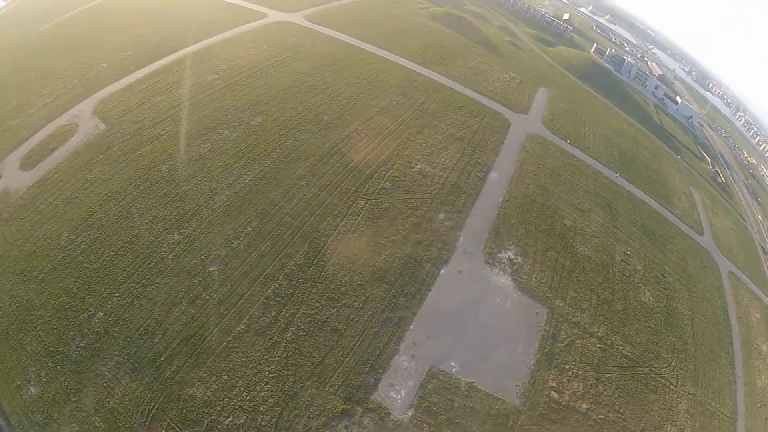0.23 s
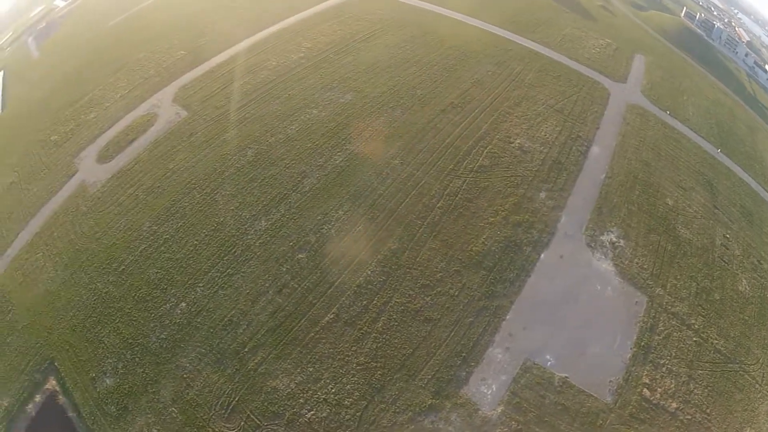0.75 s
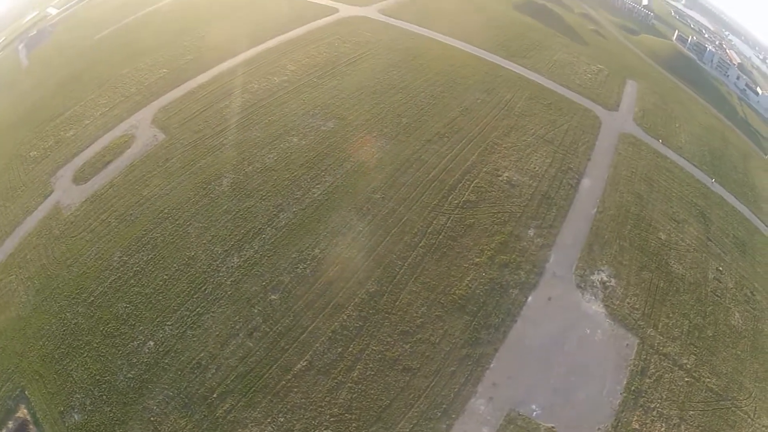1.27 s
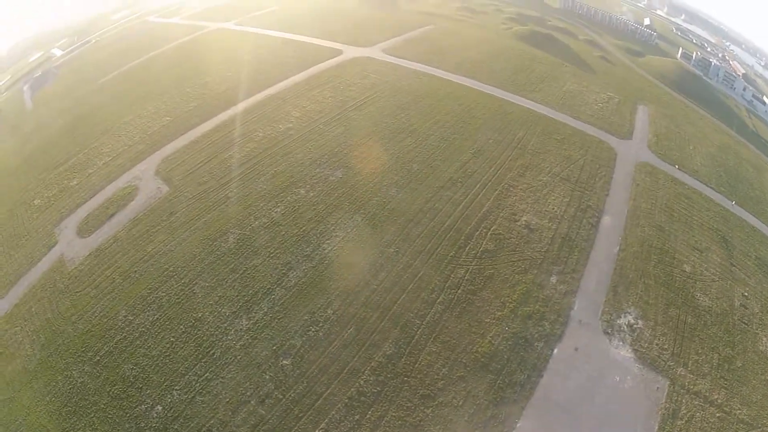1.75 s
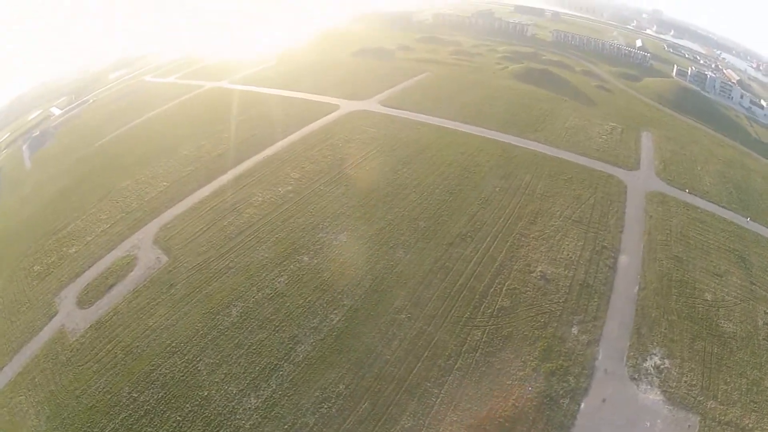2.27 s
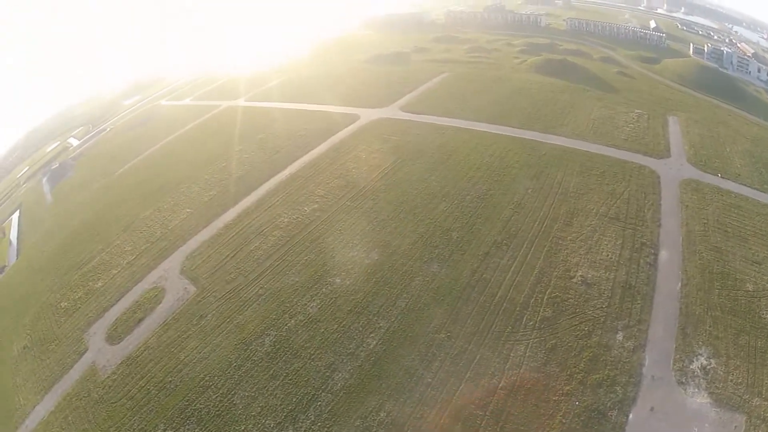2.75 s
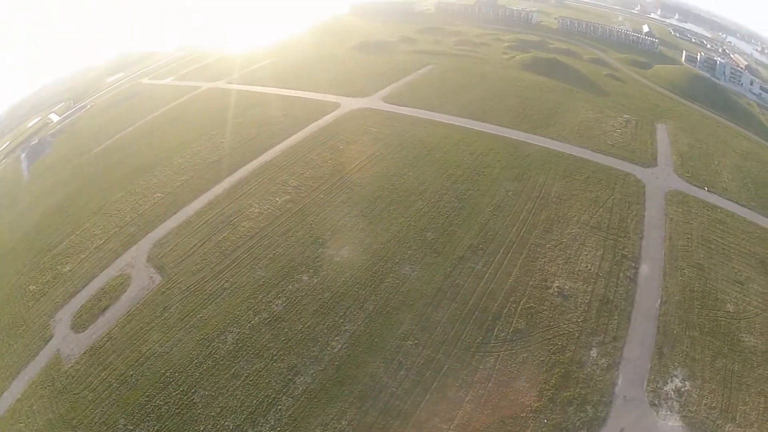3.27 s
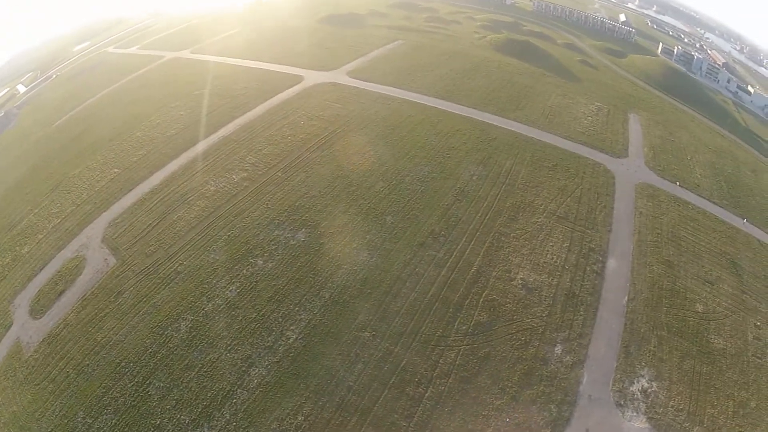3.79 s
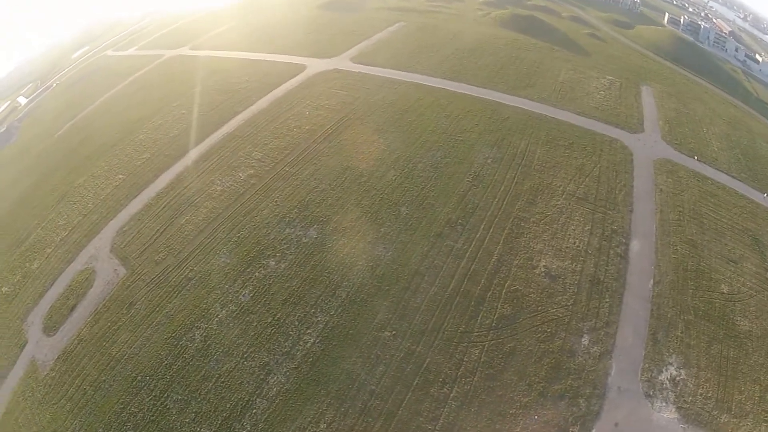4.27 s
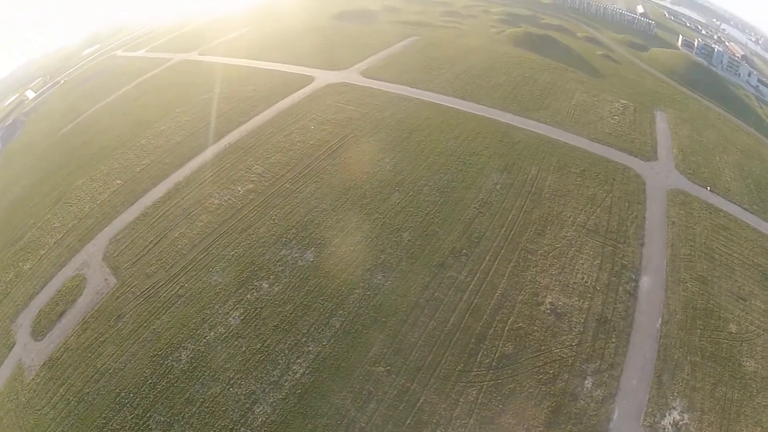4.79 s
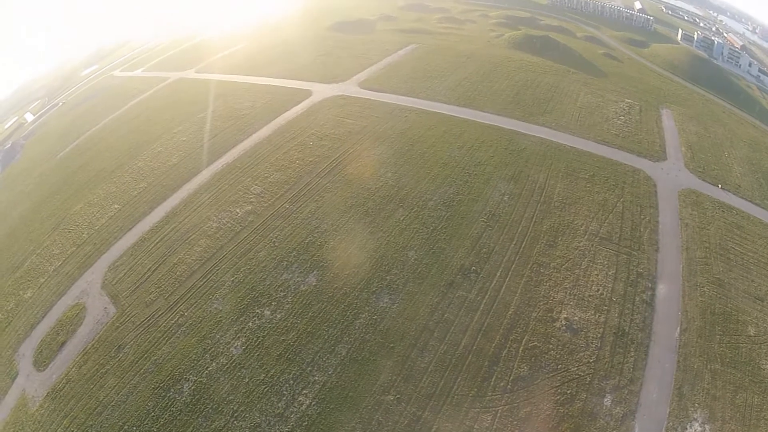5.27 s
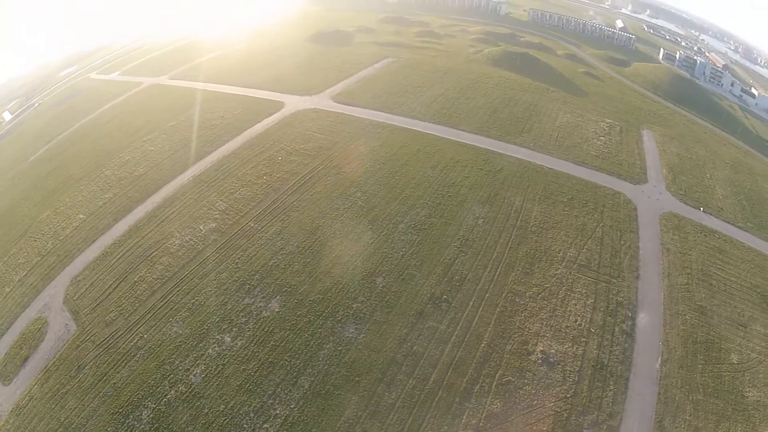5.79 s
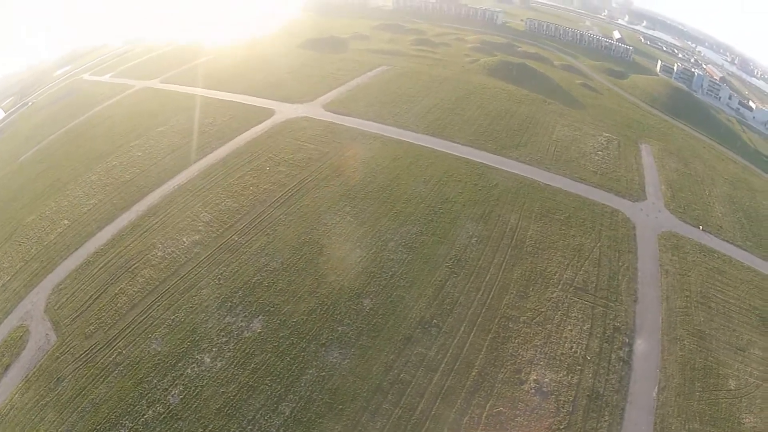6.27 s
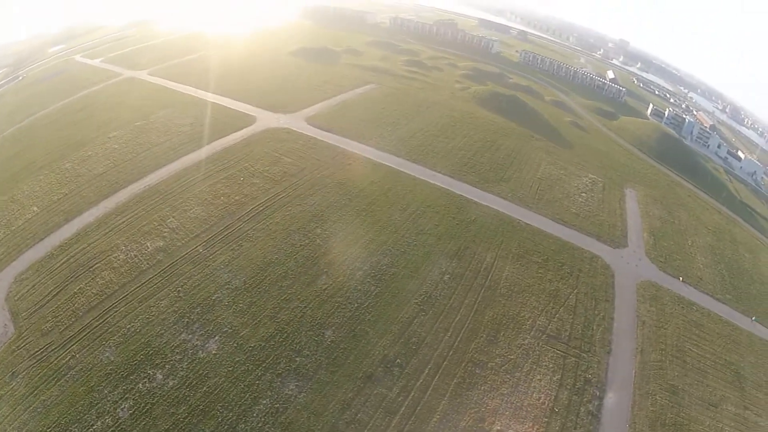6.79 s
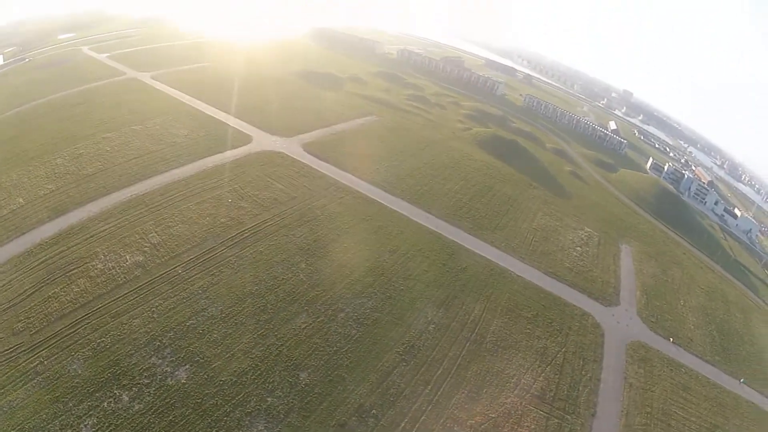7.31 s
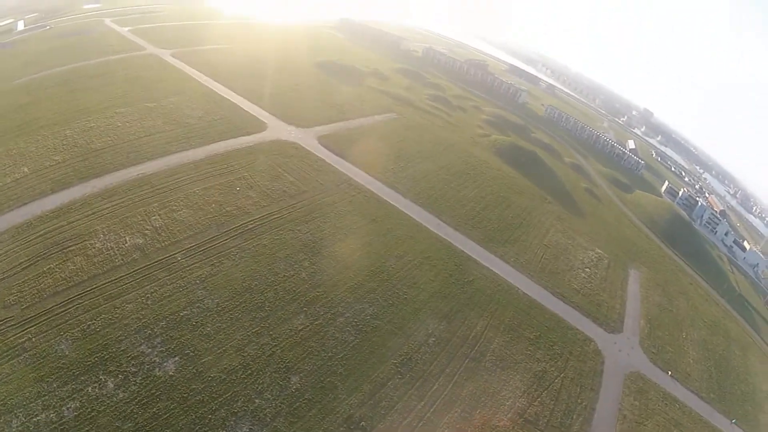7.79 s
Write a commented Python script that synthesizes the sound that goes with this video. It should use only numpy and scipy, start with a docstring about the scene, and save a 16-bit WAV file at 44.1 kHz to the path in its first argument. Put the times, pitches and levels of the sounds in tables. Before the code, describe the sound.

Heard on board, a model plane's propeller hum winds down to a low, slow throb as air rushes past and loose parts knock.

```python
"""On the body of a small electric model plane, a tiny camera listens as it throttles back and glides down.
The drive's tones follow one shaft speed, so they slide down together through the airframe's resonances,
and two neighbours beat in an ever slower throb. Beneath them the airframe shakes roughly and air rushes
past; from midway on, loose parts knock in the fuselage. The camera samples coarsely and holds each
sample, which mirrors the whole sound into a thin sizzle in the treble."""
import sys
import numpy as np
from scipy import signal
from scipy.fft import rfft, irfft, next_fast_len
from scipy.io import wavfile

SR = 44100
rng = np.random.default_rng(int(sys.argv[2]) if len(sys.argv) > 2 else 0)


def transcribe(u):
    """Save the signal u as a 16-bit wav file named by the first command-line argument.

    u: samples, shape (n,) or (channels, n), limited to [-1, 1]; the rate is SR.
    q: integer samples, one column per channel.
    """
    v = np.clip(np.atleast_2d(u).T, -1, 1)
    q = np.round(v * 32767).astype(np.int16)
    wavfile.write(sys.argv[1], SR, q)


N = 355005
TIME = np.arange(N) / SR

# main tone of the motor and propeller: time_s, pitch_hz
MAIN_PITCH = [(0.0, 395.1), (0.22, 378.2), (0.82, 362.8), (1.54, 367.7), (2.18, 383.6), (2.5, 369.8),
              (2.82, 364.0), (3.07, 349.5), (3.39, 322.1), (4.06, 280.0), (4.43, 260.4), (5.33, 249.9),
              (5.55, 235.6), (6.64, 186.7), (7.54, 158.3), (8.05, 137.6)]
# its strength as it meets resonances and nodes of the body: pitch_hz, level_db
MAIN_RESPONSE = [(138, -43), (160, -37.5), (178, -29), (202, -47), (220, -31.5), (250, -33), (265, -21),
                 (297, -17), (363, -22), (395, -33)]
# lag of the throb behind the drive's slow cycle: time_s, lag_cycles
THROB_PHASE = [(2.7, .7), (3.3, 1.15), (4.05, 1.17), (4.4, .9), (5.2, .95), (6.3, 1.08), (6.55, 1.36),
               (7.3, 1.42), (7.65, 1.12), (8.05, 1.55)]
# a partner tone just under the main one: time_s, level_db
PARTNER_LEVEL = [(0, -50), (.8, -31), (2.8, -34.5), (3.3, -23), (3.8, -18), (4.3, -41.5), (4.7, -28.5),
                 (6, -46.5), (8.05, -50)]
# weaker tones at cruise, before the airframe colours them: waves_per_cycle, level_db
SIDE_TONES = [(20, -45.5), (23, -37), (25, -39.5), (27, -41.5), (29, -47.5), (31, -37.5), (33, -36),
              (36, -39), (39, -33), (40, -38.5), (49, -42), (50, -42), (59, -40.5), (61, -43), (73, -33.5),
              (76, -44.5), (80, -46), (84, -42)]
# response of the airframe to those tones: frequency_hz, gain_db
AIRFRAME_RESPONSE = [(130, -2), (170, 2), (195, -6.5), (225, -9.5), (290, 6.5), (335, 1), (365, -3.5),
                     (410, -25), (500, -17), (590, -10.5), (660, -14.5), (750, -17), (1000, -21.5)]
# spectrum of the airframe's shaking: frequency_hz, relative_density_db
SHAKE_SPECTRUM = [(85, -29.5), (105, -18.5), (130, -9.5), (170, -7), (195, -11), (230, -3.5), (285, 2.5),
                  (335, -4), (365, -15), (410, -21.5), (520, -25.5), (590, -20), (670, -31.5), (900, -35)]
# strength of the slipstream's rush: time_s, relative_level_db
RUSH_LEVEL = [(0, -43.5), (.5, -43.5), (1.7, -40), (2.7, -42.5), (3.25, -46.5), (4.9, -45), (5.8, -47),
              (6.65, -45.8), (8.05, -49)]
# brief gusts in the slipstream: centre_s, half_width_s, lift_db
RUSH_GUSTS = [(.88, 0.041, 1.5), (2.35, 0.048, 2.5)]
# spectrum of the rush: frequency_hz, relative_density_db
RUSH_SPECTRUM = [(350, 2.5), (600, -7.5), (850, -1.5), (1170, -2.5), (1600, -1), (1900, 1), (2600, -4),
                 (3200, -9.5), (3650, -7), (4200, -17.5), (5100, -17), (5900, -26.5)]
# hollows that the air blows over: centre_hz, width_hz, lift_db
CAVITY_RESONANCES = [(973, 92, 6), (1376, 88, 6.5)]
# strength of the air's low buffeting: time_s, relative_level_db
BUFFET_LEVEL = [(0, -43), (.9, -36.5), (1.6, -37.5), (2.6, -38.5), (3.7, -40.5), (4.7, -39), (5.6, -40.5),
                (6.3, -43), (7.5, -38), (8.05, -47)]
# spectrum of the buffeting: frequency_hz, relative_density_db
BUFFET_SPECTRUM = [(12, -22), (21, -11.5), (29, -0.5), (38, 1.5), (48, -0.5), (58, -3.5), (72, -21),
                   (110, -14)]
# knocks of loose parts: start_s, thump_db, clack_db, clack_hz, clack_ring_s
IMPACTS = [(3.530, -32, -42, 1950, .004), (3.592, -29, -38, 1850, 0.0035),
           (3.670, -34.5, -35.5, 3010, 0.00061), (4.378, -45, -40.5, 1900, .002),
           (4.807, -40, -39.5, 1820, .0018), (4.918, -46, -43, 2200, .0012), (5.250, -41, -42, 1880, .0015),
           (5.470, -52, -50, 5300, .0004), (5.850, -41, -41, 1820, 0.0025), (6.204, -37, -34, 1890, 0.001),
           (6.489, -37, -51, 1100, .002), (6.769, -36, -35, 1900, 0.0013), (7.086, -41, -47, 1600, 0.0018),
           (7.750, -43, -43, 1400, .0012)]
# modes that a knock rings in the fuselage: pitch_hz, gain_db, ring_s
FUSELAGE_MODES = [(607, -3.5, 0.0042), (958, -7, 0.0016), (1450, -10.5, 0.00099)]

MAIN_ORDER, CRUISE_HZ = 37, 365  # main tone: waves per slow cycle of the drive, pitch at cruise
THROB_START_HZ, THROB_FULL_HZ = 352, 178  # main pitches where its twin enters and where it equals it
LULL_S, LULL_HALF_WIDTH_S, LULL_DB, LULL_ABOVE_HZ = 2.13, 0.24, -6.5, 183
CAMERA_RATE_HZ, HOLD_STEPS, CUTOFF_HZ = 12000, 4, 15300


def from_db(db):
    """Amplitude grows tenfold for every 20 dB."""
    return 10 ** (np.asarray(db) / 20)


def unit_rms(x):
    """Division by the root mean square gives unit power."""
    return x / np.sqrt(np.mean(x ** 2) + 1e-20)


def in_time(curve):
    """Linear interpolation gives a curve's value at every sample."""
    return np.interp(TIME, *np.transpose(curve))


def at_hz(spectrum, hz):
    """Interpolation in log frequency gives a spectrum's level in dB."""
    points_hz, db = np.transpose(spectrum)
    return np.interp(np.log(np.maximum(hz, 1)), np.log(points_hz), db)


def bump(centre_s, half_width_s):
    """A Gaussian rises to 1 and falls back around one moment."""
    return np.exp(-((TIME - centre_s) / half_width_s) ** 2)


def drift(rate_hz):
    """Low-pass filtered noise wanders slowly, with rms 1."""
    step, settle = 40, 2000
    pole = np.exp(-2 * np.pi * step * rate_hz / SR)
    noise = rng.standard_normal(N // step + settle + 2)
    slow = signal.lfilter([1], [1, -2 * pole, pole * pole], noise)[settle:]
    return np.interp(np.arange(N) / step, np.arange(len(slow)), unit_rms(slow))


def tone(cycles, order):
    """Dispersion: the bending body gives each harmonic of the slow cycle its own phase; rms 1."""
    phase_cycles = .05 * order ** 2
    return np.sqrt(2) * np.sin(2 * np.pi * (order * cycles + phase_cycles))


def main_tone(cycles, pitch_hz, waver_db=0.5, crest_db=1.0):
    """Beating: close tones throb at their difference frequency, which falls as the motor slows."""
    throb_cycles = cycles - in_time(THROB_PHASE)
    depth = np.clip((THROB_START_HZ - pitch_hz) / (THROB_START_HZ - THROB_FULL_HZ), 0, 1)
    twin = tone(cycles - throb_cycles / MAIN_ORDER, MAIN_ORDER)  # slips back one wave per throb
    pointed_db = crest_db * depth * np.cos(2 * np.pi * throb_cycles)  # sharpens each throb
    gain = from_db(at_hz(MAIN_RESPONSE, pitch_hz) + pointed_db + waver_db * drift(5.5))
    partner_gain = from_db(in_time(PARTNER_LEVEL) + waver_db * drift(12.0))
    partner = partner_gain * tone(cycles, MAIN_ORDER - 2)
    return gain * (tone(cycles, MAIN_ORDER) + depth * twin) + partner


def side_tones(cycles, cycle_hz, speed, lull, waver_db=2.0, wander_waves=0.095):
    """Forced vibration: each weak, unsteady tone swells where it crosses an airframe resonance."""
    low_fade = speed ** 1.72 * lull  # tones under the main one fade fastest
    high_fade = speed ** 0.76
    out = 0
    for order, level_db in SIDE_TONES:
        gain = from_db(level_db + at_hz(AIRFRAME_RESPONSE, order * cycle_hz) + waver_db * drift(1.9))
        fade = low_fade if order < MAIN_ORDER else high_fade
        wander = wander_waves * drift(3.1) / order
        out = out + gain * fade * tone(cycles + wander, order)
    return out


def chatter(cycles, cycle_hz, speed, order=60, peak_at_cycle=.86, sharpness=3.2, rebound=.38):
    """Amplitude modulation: a higher tone pulses once a slow cycle, and lightly half a cycle later."""
    swing = np.cos(2 * np.pi * (cycles - peak_at_cycle))
    pulse = np.exp(sharpness * (swing - 1)) + rebound * np.exp(sharpness * (-swing - 1))
    gain = from_db(-26.0 + at_hz(AIRFRAME_RESPONSE, order * cycle_hz) + 0.2 * drift(7.4))
    return speed ** 1.8 * pulse * gain * tone(cycles, order)


def drive_tones(pitch_hz, speed, lull):
    """Harmonics of rotation: one shaft speed sets every pitch, so all glide together."""
    cycle_hz = pitch_hz / MAIN_ORDER  # the slow cycle: the drive's pattern repeats a few times a second
    cycles = np.cumsum(cycle_hz) / SR
    sides = side_tones(cycles, cycle_hz, speed, lull)
    pulsing = chatter(cycles, cycle_hz, speed)
    return main_tone(cycles, pitch_hz) + sides + pulsing


def shaped_noise(spectrum, resonances=(), skirt_db_per_octave=24):
    """Spectral shaping: white noise takes on a given spectrum and resonance peaks; rms 1."""
    size = next_fast_len(N)
    hz = np.maximum(np.arange(size // 2 + 1) * SR / size, 1)
    octaves_outside = np.abs(np.log2(hz / np.clip(hz, spectrum[0][0], spectrum[-1][0])))
    db = at_hz(spectrum, hz) - skirt_db_per_octave * octaves_outside
    for centre_hz, width_hz, lift_db in resonances:
        db = db + lift_db / (1 + (2 * (hz - centre_hz) / width_hz) ** 2)
    white = rfft(rng.standard_normal(size))
    return unit_rms(irfft(white * from_db(db), size)[:N])


def airframe_shaking(speed, lull, cruise_db=-24.5, waver_db=1.5):
    """Random excitation: shaking rings the airframe's broad low resonances, less as the drive slows."""
    shaking = shaped_noise(SHAKE_SPECTRUM)
    low = signal.sosfiltfilt(signal.butter(4, LULL_ABOVE_HZ, fs=SR, output="sos"), shaking)
    upper = shaking - low
    strength = from_db(cruise_db + waver_db * drift(22)) * speed ** 1.32
    return strength * (low + lull * upper)


def slipstream(rush_trim_db=1.0, buffet_trim_db=-0.75, flutter_db=0.65):
    """Turbulence: passing air hisses, excites cavity resonances and buffets the camera."""
    gust_db = sum(lift_db * bump(centre_s, half_width_s) for centre_s, half_width_s, lift_db in RUSH_GUSTS)
    rush_db = in_time(RUSH_LEVEL) + gust_db + rush_trim_db + flutter_db * drift(23)
    rush = from_db(rush_db) * shaped_noise(RUSH_SPECTRUM, CAVITY_RESONANCES)
    buffet = from_db(in_time(BUFFET_LEVEL) + buffet_trim_db) * shaped_noise(BUFFET_SPECTRUM)
    return rush + buffet


def damped_mode(t, pitch_hz, ring_s):
    """Damped oscillation: a struck mode peaks after its ring time and dies away."""
    envelope = t / ring_s * np.exp(1 - t / ring_s)
    return np.sqrt(2) * envelope * np.sin(2 * np.pi * (pitch_hz * t + rng.random()))


def knocks():
    """Impact excitation: a loose part clacks at its own pitch and rings the fuselage's modes."""
    out = np.zeros(N)
    t = np.arange(SR // 10) / SR
    for start_s, thump_db, clack_db, clack_hz, clack_ring_s in IMPACTS:
        thump = sum(from_db(db) * damped_mode(t, hz, ring_s) for hz, db, ring_s in FUSELAGE_MODES)
        clack = damped_mode(t, clack_hz, clack_ring_s)
        start = round(start_s * SR)
        out[start:start + len(t)] += from_db(clack_db) * clack + from_db(thump_db) * thump
    return out


def scene():
    """Superposition: vibration carried through the body adds to the noise of the air."""
    pitch_hz = in_time(MAIN_PITCH)
    speed = pitch_hz / CRUISE_HZ
    lull = from_db(LULL_DB * bump(LULL_S, LULL_HALF_WIDTH_S))  # low side tones and upper shaking dip
    body = drive_tones(pitch_hz, speed, lull) + airframe_shaking(speed, lull) + knocks()
    return (body + slipstream())[None]


def record(dry):
    """Spectral imaging: sample-and-hold mirrors the sound around the camera's rate; the top is cut."""
    coarse = signal.resample_poly(dry, CAMERA_RATE_HZ, SR, axis=-1)
    staircase = np.repeat(coarse, HOLD_STEPS, axis=-1)
    held = signal.resample_poly(staircase, SR, CAMERA_RATE_HZ * HOLD_STEPS, axis=-1)[:, :N]
    low_pass = signal.ellip(12, .1, 90, CUTOFF_HZ, fs=SR, output="sos")
    return signal.sosfilt(low_pass, held)


dry = scene()
out = record(dry)
transcribe(out)
```